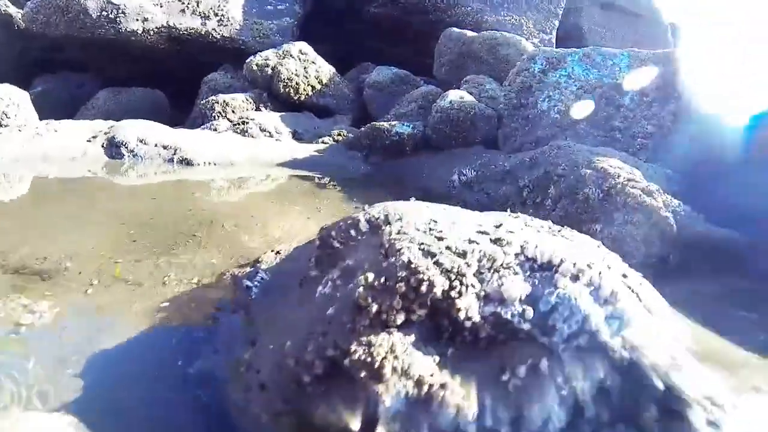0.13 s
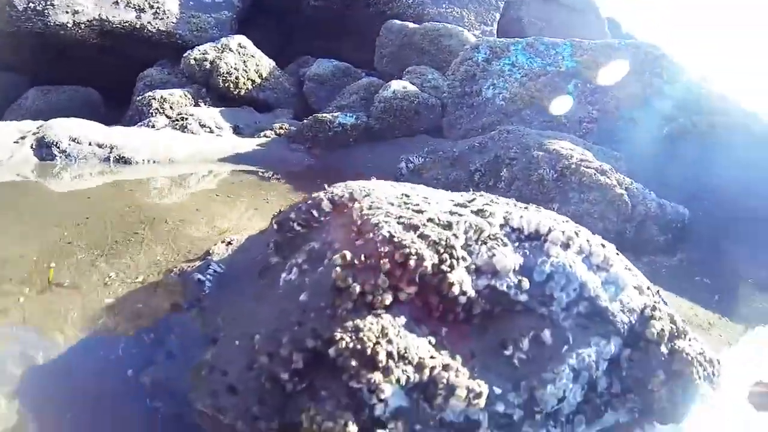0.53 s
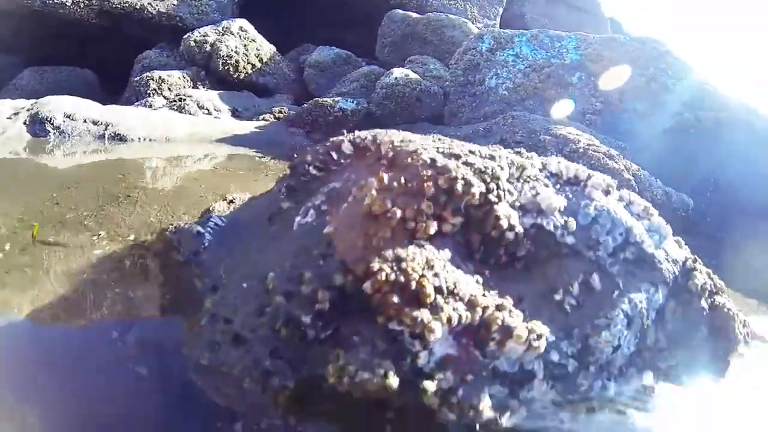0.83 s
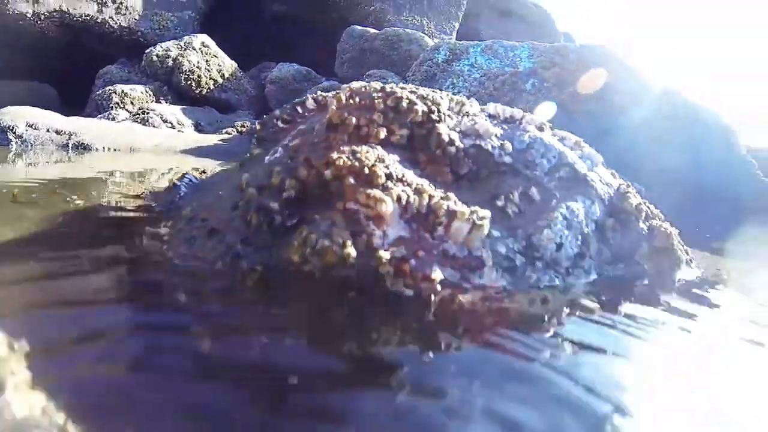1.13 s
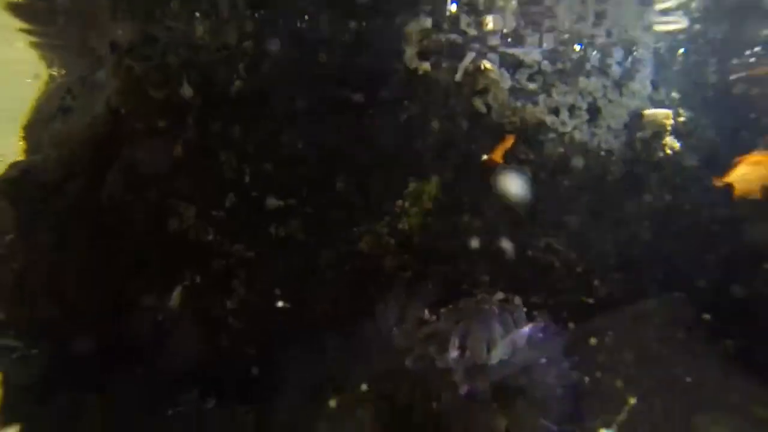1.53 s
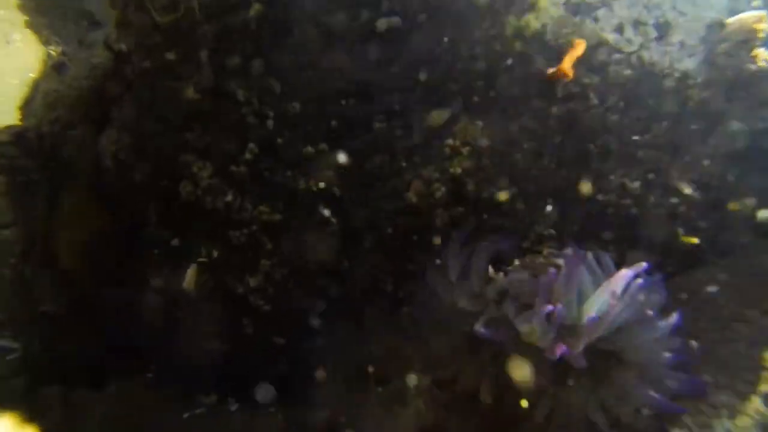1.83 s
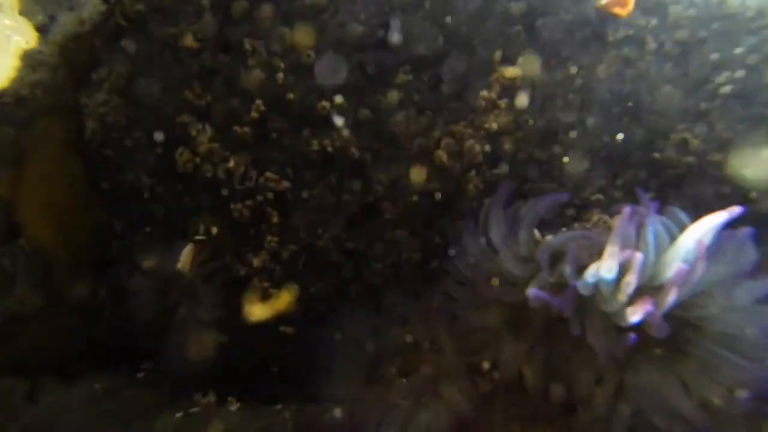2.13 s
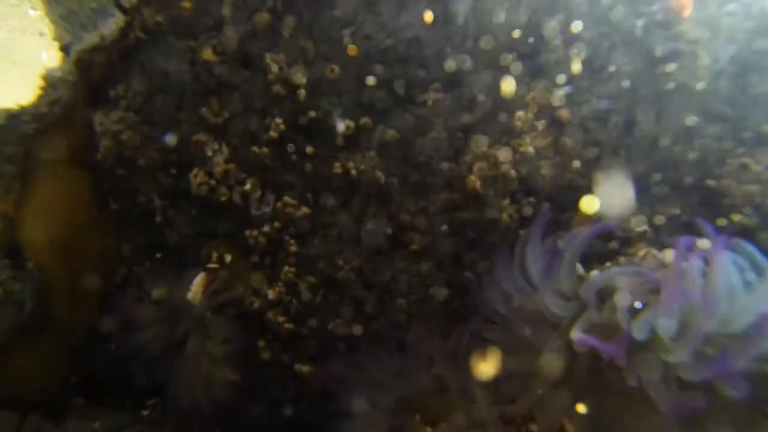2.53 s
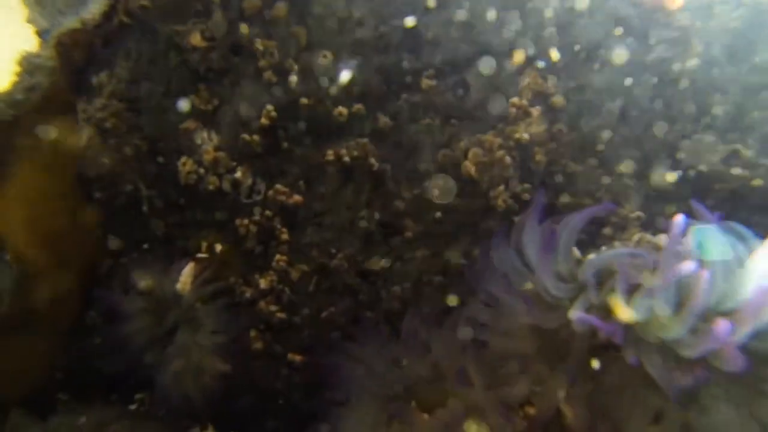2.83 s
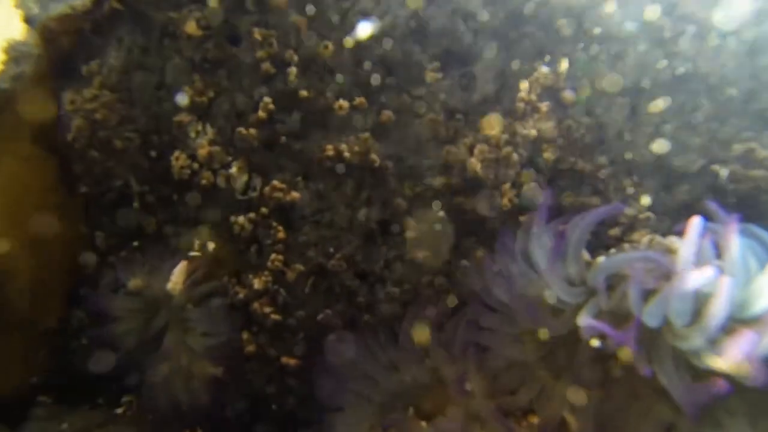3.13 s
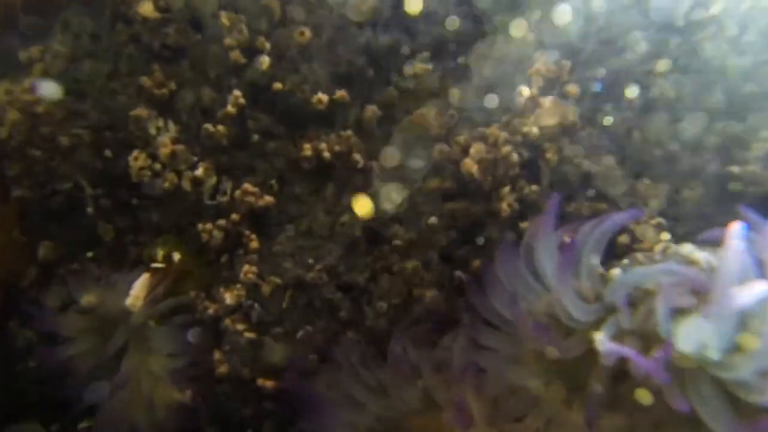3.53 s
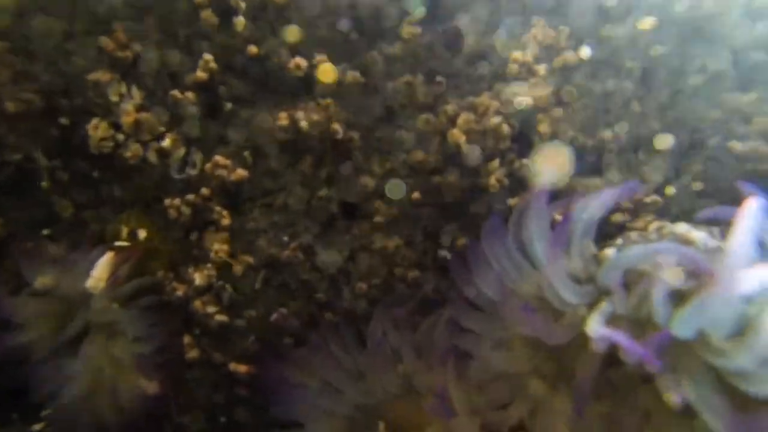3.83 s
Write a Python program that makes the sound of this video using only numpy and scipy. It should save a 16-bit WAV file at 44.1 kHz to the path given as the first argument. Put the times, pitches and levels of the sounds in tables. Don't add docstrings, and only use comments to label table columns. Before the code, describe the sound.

Water slaps and bubbles plop sharply as a cased camera dips into a rocky pool, after light drips and ticks over faint hiss; muffled quiet follows, then a brief rock scrape, all close on the microphone.

```python
import sys
import numpy as np
from scipy import signal
from scipy.fft import rfft, irfft, next_fast_len
from scipy.io import wavfile
from scipy.ndimage import uniform_filter1d, map_coordinates

SR = 44100
rng = np.random.default_rng(int(sys.argv[2]) if len(sys.argv) > 2 else 0)


def pcm_store(signal):
    levels = np.round(np.clip(np.atleast_2d(signal), -1, 1) * 32767)
    wavfile.write(sys.argv[1], SR, levels.astype(np.int16).T)


def level_to_linear(level):
    exponent = np.asarray(level, float) / 20
    return 10 ** exponent


N = 176400


def unit(x):
    return x / np.sqrt(np.mean(x ** 2) + 1e-20)


def along(points, hz):
    f, v = np.transpose(points)
    return np.interp(np.log(hz + 1), np.log(f + 1), v)


def curve(rows):
    return np.interp(np.arange(N) / SR, *np.transpose(rows))


def wobble(rate_hz, size=N):
    knots = rng.standard_normal(int(size * rate_hz / SR) + 4)
    return map_coordinates(knots, [np.arange(size) * rate_hz / SR])


def coloured(gain_db, size=N):
    m = next_fast_len(size + 2048)
    spectrum = rfft(rng.standard_normal(m)) * level_to_linear(gain_db(np.fft.rfftfreq(m, 1 / SR)))
    return unit(irfft(spectrum, m)[:size])


def band(centre_hz, octaves):
    return coloured(lambda f: np.maximum(-12 * (np.log2((f + 1) / centre_hz) / octaves) ** 2, -90))


def bubbles(rows, wet=1):
    rise, attack_s, twin_db, twin_spread, flutter_db = 0.032, 0.00083, -11.5, 0.11, 5.5
    out, t = np.zeros(N + SR), np.arange(SR // 4) / SR
    for start_s, db, hz, t60_s in rows:
        age = t / t60_s
        tremble = wet * 0.5 * wobble(400, size=len(t))
        phase = 2 * np.pi * hz * (t + rise * wet * t ** 2 / t60_s) + tremble
        twin_ratio = 1 + twin_spread * rng.choice([-1, 1]) * rng.uniform(0.45, 1)
        twin = wet * level_to_linear(twin_db + 6 * age) * np.sin(twin_ratio * phase)
        fade = level_to_linear(-45 * age - 40 * age ** 2)
        flutter = level_to_linear(wet * flutter_db * wobble(350, size=len(t)) * np.minimum(4 * age, 1))
        attack = 1 - np.exp(-t / attack_s)
        out[round(start_s * SR):][:len(t)] += level_to_linear(db + 1.5) * fade * (np.sin(phase) + twin) * flutter * attack
    return out[:N]


def bursts(rows, body, t60_s):
    grit_db = 3
    out, t = np.zeros(N + SR), np.arange(SR // 8) / SR
    age = t / t60_s
    fade = level_to_linear(-50 * age) + 2.1 * level_to_linear(-260 * age)
    attack = 1 - np.exp(-t / 0.00023)
    for start_s, db, *tilt_db in rows:
        puff = coloured(lambda f: along(body, f) + sum(tilt_db) * np.log2((f + 50) / 3000), size=len(t))
        grit = level_to_linear(grit_db * wobble(500, size=len(t)) * np.minimum(5 * age, 1))
        out[round(start_s * SR):][:len(t)] += level_to_linear(db - 8) * fade * puff * grit * attack
    return out[:N]


def patchy_hiss():
    # frequency in Hz, density in dB per Hz.
    hiss_colour = [(59, -36), (100, -6.5), (316, -20), (1020, -28.5), (7250, -42.5), (9370, -47),
                   (13000, -46.5), (16000, -61.5)]
    z = signal.stft(coloured(lambda f: along(hiss_colour, f)), nperseg=512)[2]
    patches = uniform_filter1d(uniform_filter1d(rng.standard_normal(z.shape), 5, 0), 8, 1)
    return unit(signal.istft(z * level_to_linear(2 * unit(patches)), nperseg=512)[1][:N])


def frame_whine():
    frame_hz, whine_hz, blip_hz = 29.97, 11294, 7400
    t = np.arange(N) / SR
    gate = uniform_filter1d(((t * frame_hz - 0.43) % 1 < 0.42) * 1.0, size=90)
    whine = level_to_linear(-11 + 2 * wobble(60)) * gate * np.sin(2 * np.pi * whine_hz * t + 0.8 * wobble(300))
    since_s = (t * frame_hz - 0.42) % 1 / frame_hz
    blip = level_to_linear(-60 * since_s / 0.0066 + 4 * wobble(18)) * np.sin(2 * np.pi * blip_hz * since_s)
    return whine + blip


def case_hum():
    # centre in Hz, width in octaves, level in air in dB, level under water in dB.
    resonances = [
        (1500, .2, -9.5, -21.5),
        (3420, .2, -14, -24),
        (500, 0.37, -14.5, -6),
    ]
    under_s = 1.3
    t = np.arange(N) / SR
    return sum(level_to_linear(np.where(t < under_s, air_db, water_db) + 2.53 * wobble(10)) * band(hz, octaves)
               for hz, octaves, air_db, water_db in resonances)


def floor():
    # time in seconds, hiss level in dB.
    gain = [(0, -63), (1.19, -64), (1.22, -70), (1.8, -71.5), (2.2, -64.5), (3.64, -65.5), (3.7, -64.5),
            (4, -65.5)]
    return level_to_linear(curve(gain)) * (level_to_linear(5.5) * patchy_hiss() + case_hum() + frame_whine())


def sway():
    # time in seconds, level in dB.
    sway_level = [(0, -32), (.3, -32), (.45, -33), (.56, -33), (.66, -28), (.87, -24), (1.0, -29),
                  (1.18, -32), (1.22, -46.5), (1.78, -46), (1.9, -36), (2.1, -37), (2.3, -33), (2.8, -34),
                  (3.1, -38), (3.5, -33), (4, -32)]
    # frequency in Hz, density in dB per Hz.
    rumble = [(5, -27.5), (10, -0.5), (32, -1), (140, -40), (300, -120)]
    lumps = level_to_linear(2 * wobble(10))
    return level_to_linear(curve(sway_level)) * unit(lumps * coloured(lambda f: along(rumble, f)))


def crackle(count=260):
    # time in seconds, grain level in dB.
    film = [(0, -57), (.28, -54), (.6, -57), (4, -77.5)]
    when, pitch, size = rng.uniform(size=(count, 3)).T
    hz, t = 1100 * 6 ** pitch[:, None], np.arange(220) / SR
    start = (when ** 1.5 * (N - 1)).astype(int)
    peak = ((1 - size) ** -0.25)[:, None]
    grain = peak * np.exp(-t * hz / 2.3) * np.sin(2 * np.pi * hz * t)
    at = start[:, None] + np.arange(220)
    return level_to_linear(curve(film)) * np.bincount(at.ravel(), grain.ravel(), N + 220)[:N]


def rubs():
    # centre in seconds, length in seconds, level in dB, frequency in Hz, width in octaves.
    strokes = [
        (0.178, 0.19, -69, 4850, .12),
        (0.654, 0.022, -48, 1457, 0.15),
        (1.008, 0.043, -65, 5000, 2.7),
        (1.972, 0.075, -69.5, 1500, 0.37),
        (2.55, 0.1, -65, 1550, 0.3),
    ]
    t = np.arange(N) / SR
    out = np.zeros(N)
    for centre_s, long_s, db, hz, octaves in strokes:
        swell_db = -27 * np.minimum(((t - centre_s) / long_s) ** 2, 9)
        out += level_to_linear(db + swell_db + 2.7 * wobble(140)) * band(hz, octaves)
    return out


def drops():
    # start in seconds, peak in dB, pitch in Hz.
    drips = [(0.0317, -31.5, 1500), (0.131, -39, 1960), (0.136, -42, 1960), (0.193, -30.5, 1380),
             (0.2052, -28.5, 1250), (0.2286, -34, 1340), (0.646, -37, 1490), (0.9423, -42.5, 1310),
             (1.045, -39, 1500), (1.108, -47.5, 2000), (2.4324, -47, 3270), (2.5482, -38, 1626),
             (3.5825, -49.5, 1410)]
    # start in seconds, peak in dB.
    ticks = [
        (0.0858, -43.5),
        (0.118, -47),
        (0.1506, -50),
        (0.1657, -44),
        (0.173, -43),
        (0.2237, -38),
    ]
    # start in seconds, peak in dB, extra brightness in dB per octave if any.
    taps = [(0.0324, -31), (0.1931, -29), (0.2056, -33.5), (0.2314, -34), (0.3668, -37, 2), (0.4685, -42),
            (0.6175, -45, 4), (1.0427, -49), (2.14, -39), (2.5485, -42.5), (2.93, -49), (3.6363, -49.5)]
    # frequency in Hz, gain in dB.
    tap_colour = [(300, -50), (1400, 7), (3500, 2), (6000, -11), (16000, -22.5)]
    rings = [(*row, 0.013) for row in drips] + [(*row, 4850, 0.01) for row in ticks]
    return bubbles(rings, wet=0.76) + bursts(taps, tap_colour, 0.0099)


def scrape():
    # start in seconds, peak in dB, extra brightness in dB per octave if any.
    slips = [(3.651, -12), (3.6565, -4), (3.6605, -7.5), (3.664, -13), (3.677, -16.5), (3.681, -15),
             (3.6968, -10.5, 1), (3.7035, -13.5), (3.7115, -16.5), (3.717, -16.5), (3.7236, -16.5, 0.86),
             (3.730, -22.5), (3.735, -27), (3.742, -34), (3.7583, -37, 3)]
    # time in seconds, level in dB.
    grind_level = [(3.651, -21), (3.673, -34.5), (3.68, -30.5), (3.736, -36), (3.742, -46), (3.79, -60)]
    # frequency in Hz, density in dB per Hz.
    rock = [(150, -4.5), (700, -6), (1150, -11.5), (1650, -14.5), (2250, -18.5), (3000, -16.5), (4000, -29),
            (16000, -53)]
    # start in seconds, peak in dB, pitch in Hz, t60 in seconds.
    pushes = [
        (3.6522, -9.5, 429, 0.015),
        (3.6555, -13.5, 190, 0.039),
        (3.6605, -22, 60, .1),
        (3.6552, -10.5, 576, 0.04),
        (3.6572, -8, 36.6, 0.13),
        (3.6942, -14, 60, 0.12),
    ]
    # start in seconds, peak in dB, pitch in Hz, t60 in seconds.
    chatter = [(3.6515, -21, 3080, 0.017), (3.657, -21.5, 2260, 0.019), (3.658, -23.5, 3050, 0.024),
               (3.659, -13.5, 1298, 0.024), (3.681, -25.5, 1620, 0.089), (3.687, -24, 770, .04),
               (3.704, -27, 820, 0.018), (3.705, -25.5, 2770, 0.023), (3.711, -17, 906, 0.026),
               (3.728, -30, 1600, 0.044), (3.762, -50, 1700, .015), (3.6515, -16, 850, .015),
               (3.697, -21, 797, .015)]
    gate = np.interp(np.arange(N) / SR, [3.650, 3.652, 3.77, 3.79], [0, 1, 1, 0])
    grind = gate * level_to_linear(curve(grind_level) + 5 * wobble(300)) * coloured(lambda f: along(rock, f))
    return grind + bursts(slips, rock, 0.014) + bubbles(pushes, wet=0) + bubbles(chatter, wet=0.9)


def thuds():
    # start in seconds, peak in dB.
    closures = [
        (1.201, -26.5),
        (1.294, -34),
        (1.3228, -34.5),
        (1.402, -33.5),
        (1.587, -26),
        (1.660, -47),
        (1.7078, -24.5),
        (1.7877, -33),
        (2.14, -36.5),
    ]
    t = np.arange(N) / SR
    out = np.zeros(N)
    for start_s, db in closures:
        age = np.clip(t - start_s, 0, 1) / 0.00097
        out += level_to_linear(db) * np.e * age * np.exp(-age)
    return out


def slaps():
    # start in seconds, peak in dB, brightness in dB per octave.
    hits = [(1.1973, -24, -5), (1.2005, -32, -3), (1.2103, -17, -0.5), (1.2225, -20.5, -1.5),
            (1.2294, -34, -4), (1.2547, -42, -7), (1.2798, -35, 0), (1.2922, -14, -2.5), (1.3148, -28, -3),
            (1.3205, -27, -1.5), (1.3232, -19.5, -3), (1.329, -24, -4), (1.3357, -11.5, -2),
            (1.3444, -20, -2.5), (1.350, -21, -4), (1.3660, -34, -1), (1.3751, -33, -1), (1.379, -37, -1),
            (1.4009, -26, 2), (1.4075, -32.5, -3), (1.4245, -38.5, -3), (1.4655, -52, -3), (1.469, -51, 1),
            (1.4918, -50, -3), (1.498, -50, -4), (1.5045, -60, -3), (1.5401, -45.5, -2), (1.552, -44.5, -2),
            (1.578, -44, 1), (1.5818, -30, 2.5), (1.5875, -37, -2), (1.5954, -38, -3),
            (1.6517, -29.5, -2.5), (1.6695, -24.5, 1.5), (1.6882, -34, -6), (1.695, -41, -3),
            (1.7052, -26.5, -2), (1.7084, -30, -3), (1.7163, -24, 3), (1.7833, -31.5, -4)]
    # frequency in Hz, gain in dB.
    shell = [(100, -22.5), (500, -6.5), (1500, 2.5), (3200, -2.5), (4500, -14.5), (5800, -13), (9000, -18),
             (16000, -22)]
    return bursts(hits, shell, 0.02)


def glugs():
    # start in seconds, peak in dB, pitch in Hz, t60 in seconds.
    pockets = [(1.3205, -18, 1300, .012), (1.3228, -9.5, 1040, 0.015), (1.3255, -14.5, 852, 0.035),
               (1.586, -24.5, 562, 0.039), (1.589, -26, 857, 0.046), (1.705, -18.5, 492, 0.047),
               (1.705, -20.5, 787, 0.026), (1.716, -36, 500, 0.096), (1.784, -15.5, 1360, 0.0082),
               (1.785, -16.5, 509.4, 0.05), (1.802, -40, 520, 0.079), (1.786, -28.5, 938, 0.052),
               (2.139, -38.5, 512, 0.025)]
    return bubbles(pockets, wet=0.29)


def plops():
    # start in seconds, peak in dB, pitch in Hz, t60 in seconds.
    small = [(1.2101, 3.5, 1910, 0.009), (1.21063, 5, 1950, 0.008), (1.2133, -12, 1950, 0.018),
             (1.218, -24, 1950, 0.013), (1.2245, -22, 2200, 0.018), (1.2285, -34, 3300, .016),
             (1.2548, -39, 1600, 0.012), (1.273, -50, 7800, .01), (1.2925, -15.5, 4000, 0.0096),
             (1.2923, -12.5, 1154, .02), (1.2933, -2, 1700, 0.015), (1.2978, -15, 1750, .025),
             (1.304, -24, 1890, 0.016), (1.3154, -20.5, 1500, .015), (1.3358, -13.5, 6240, 0.0063),
             (1.3358, -19, 3500, 0.009), (1.3368, -11.5, 1801, 0.036), (1.3396, 0.5, 1380, 0.011),
             (1.3425, -4.5, 1660, 0.026), (1.3465, -14, 1300, .02), (1.3497, -12.5, 1950, 0.03),
             (1.3786, -27, 3130, 0.028), (1.4009, -15, 1846, 0.013), (1.4015, -27.5, 3335, .018),
             (1.4066, -24, 2300, 0.013), (1.4700, -45.5, 1580, 0.03), (1.5938, -27.5, 1438, 0.026),
             (1.6513, -20, 1616, 0.024), (1.6697, -22.5, 3290, 0.0094), (1.7165, -25, 1600, 0.019)]
    return bubbles(small)


def scene():
    background = floor() + sway()
    case = crackle() + rubs() + drops() + scrape()
    water = thuds() + slaps() + glugs() + plops()
    return (background + case + water)[None]


def band_limit(x):
    return signal.sosfilt(signal.butter(12, 16450, fs=SR, output="sos"), x)


def record(dry):
    sensor_hz, top_hz = 48000, 16200
    picked = np.round(np.arange(N) * sensor_hz / SR) * SR / sensor_hz
    coarse = map_coordinates(np.clip(dry[0] + 0.0043, -1, 1), [picked], mode="nearest")
    m = next_fast_len(N + 2048)
    low_pass = np.clip((top_hz - np.fft.rfftfreq(m, 1 / SR)) / 500, 0, 1)
    padded = np.pad(coarse, 1024, "reflect")
    band_limited = irfft(rfft(padded, m) * low_pass, m)[None, 1024:N + 1024]
    finished = np.clip(band_limited, -1, 1)
    return band_limit(finished)


dry = scene()
out = record(dry)
pcm_store(out)
```